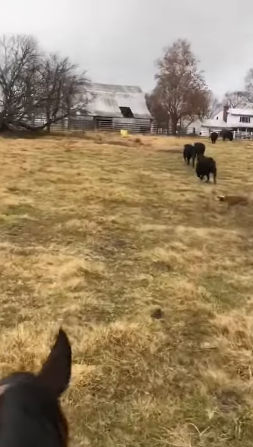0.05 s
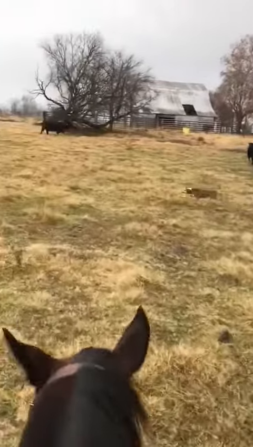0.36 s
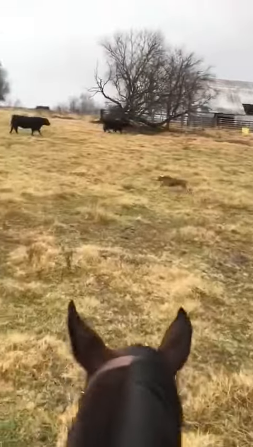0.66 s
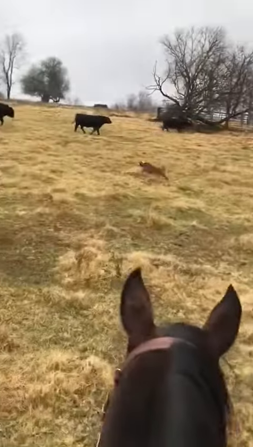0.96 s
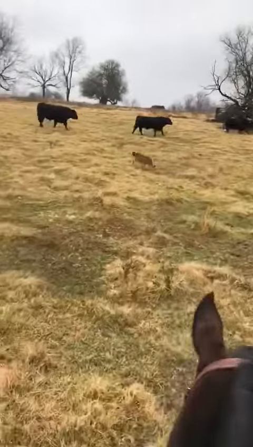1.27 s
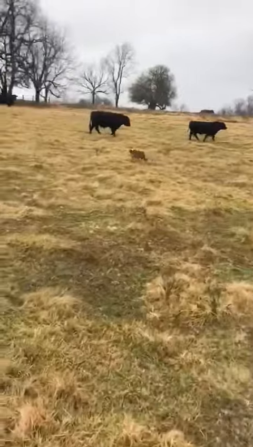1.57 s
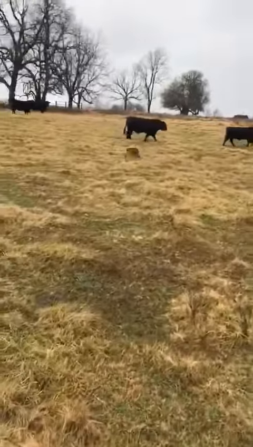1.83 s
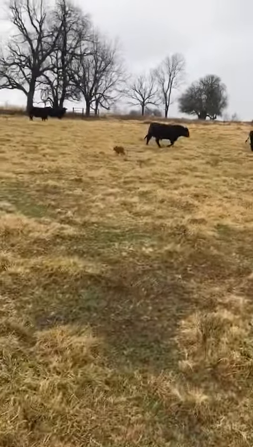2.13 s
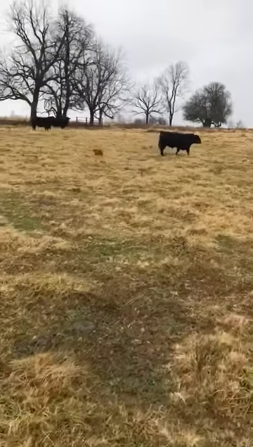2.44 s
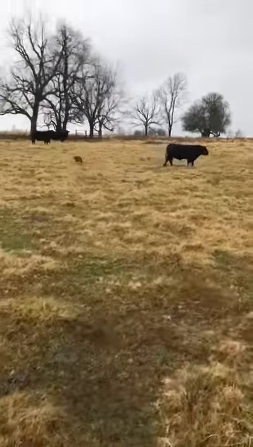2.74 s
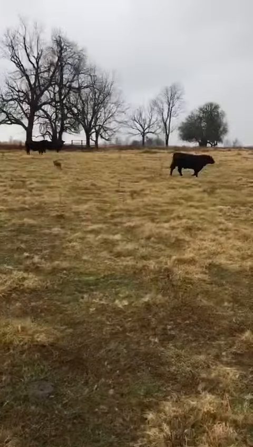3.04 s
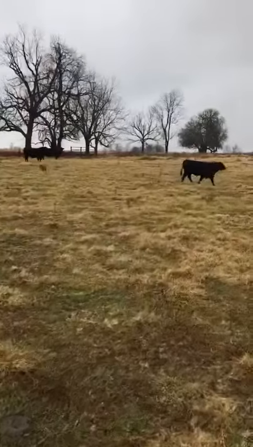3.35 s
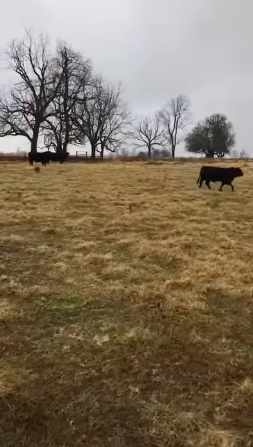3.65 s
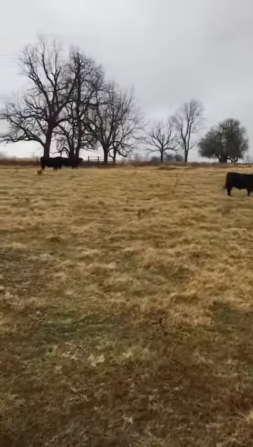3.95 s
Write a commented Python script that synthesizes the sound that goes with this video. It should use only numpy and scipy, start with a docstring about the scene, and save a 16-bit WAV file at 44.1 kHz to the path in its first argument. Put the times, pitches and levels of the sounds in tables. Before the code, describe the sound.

Cattle bellow across an open pasture. A short, higher call fills the first half second, followed by a faint, husky one. From about 1.5 seconds, deep, buzzing bellows from a bull and others overlap, loudest around 2.7 to 3.3 seconds. A softer low call continues, and a loud growling one starts near 3.8 seconds. Close by, horse tack clicks faintly, dry grass barely rustles and light wind bumps the microphone.

```python
"""An open pasture, heard from horseback: a bull and other cattle bellow in deep, overlapping voices.
Each bellow is a train of vocal pulses, a strong chest fundamental under buzzing nose and mouth
overtones, that breaks into a growl where the folds flap irregularly. Thin echoes trail the calls.
Close by, the tack clicks, dry grass rustles and light wind bumps the microphone."""
import sys
import numpy as np
from scipy import signal
from scipy.fft import rfft, irfft
from scipy.io import wavfile

SR = 44100
rng = np.random.default_rng(int(sys.argv[2]) if len(sys.argv) > 2 else 0)


def persist_wave(psi):
    """Save psi, clipped to +-1, as 16-bit WAV."""
    counts = np.round(np.clip(psi, -1, 1) * 32767).astype(np.int16)
    wavfile.write(sys.argv[1], SR, np.atleast_2d(counts).T)


N = 176400
T = np.arange(N) / SR


def amp(db):
    """Decibels to gain."""
    return 10 ** (np.asarray(db) / 20)


def unit(x):
    """Scales to rms 1."""
    return x / np.sqrt(np.mean(x ** 2) + 1e-20)


def colour(points, hz):
    """Gain of an EQ curve (f/Hz, level/dB) at these frequencies."""
    f, db = np.transpose(points)
    return amp(np.interp(np.log(hz + 1), np.log(f), db))


def shaped(x, points):
    """Filters x through an EQ curve."""
    return irfft(rfft(x) * colour(points, np.fft.rfftfreq(len(x), 1 / SR)), len(x))


def wander(rate_hz):
    """Smooth random motion of rms 1."""
    hz = np.fft.rfftfreq(N, 1 / SR)
    return unit(irfft(rfft(rng.standard_normal(N)) / np.sqrt(1 + (hz / rate_hz) ** 6), N))


def add(mix, s, sound):
    """Mixes a sound in at time s."""
    part = mix[max(round(s * SR), 0):][:len(sound)]
    part += sound[:len(part)]


def wind():
    """Low buffets on the microphone over the soft, flickering hiss of open air."""
    # Noise colours: f/Hz, level/dB
    buffet_eq = [(15, -23.5), (30, -15), (48, 5), (80, -1.5), (115, -9), (200, -13), (400, -41), (900, -85)]
    air_eq = [(120, -21), (200, 5.5), (296, -11), (454, -10.5), (596, -10.5), (757, -9), (838, -11.5),
              (913, -11.5), (1280, -10.5), (2330, -22), (2720, -22), (2960, -23.5), (5030, -28.5),
              (5960, -28.5), (7840, -35), (9780, -37), (11800, -46), (15300, -71), (22000, -120)]
    # Fader rides: t/s, level/dB
    buffet_ride = [(0.0, -59), (0.03, -44), (0.1, -51), (0.2, -32.5), (0.49, -43.5), (0.95, -46),
                   (0.98, -39.5), (1.06, -57), (1.16, -44), (1.22, -55), (1.43, -45), (1.46, -48),
                   (1.86, -43.5), (1.89, -29.5), (1.94, -48), (1.98, -30), (2.1, -56), (2.15, -45),
                   (2.24, -56), (2.28, -41), (2.47, -51.5), (2.87, -64), (3.01, -34), (3.05, -51),
                   (3.11, -33.5), (3.16, -69), (3.31, -42.5), (3.44, -57), (3.49, -39.5), (3.8, -43.5),
                   (3.84, -62.5), (4.0, -56)]
    air_ride = [(0, -47), (.5, -52), (.8, -55), (1.4, -52), (2.4, -50.5), (3.2, -50.5), (3.6, -51.5),
                (4, -53)]
    buffets = unit(shaped(rng.standard_normal(N), buffet_eq))
    hiss = unit(shaped(rng.standard_normal(N), air_eq))
    buffet_db = np.interp(T, *np.transpose(buffet_ride))
    hiss_db = np.interp(T, *np.transpose(air_ride)) + 1.7 * wander(21)
    return amp(buffet_db) * buffets + amp(hiss_db) * hiss


def grass():
    """Dry stems crackle in short swishes over a faint, steady rustle."""
    # Swishes: centre t/s, width/s, level/dB
    swishes = [(.23, 0.038, -70.5), (.42, 0.27, -72.5), (.64, 0.033, -62), (.86, 0.14, -66.5),
               (1.32, 0.041, -64.5), (1.81, 0.03, -68), (2.3, 0.099, -101), (3.2, 0.12, -72.5)]
    # Colour of the stems: f/Hz, level/dB
    stem_eq = [(800, -12), (2500, -3), (5000, -4), (6500, 3), (7600, -3), (9500, -4), (11800, -10)]
    swells = sum(amp(db) * np.exp(-.5 * ((T - s) / width) ** 2) for s, width, db in swishes)
    stems = rng.standard_normal(N) * amp(3 * np.minimum(rng.exponential(1, N), 5))
    stems *= rng.random(N) < 4000 / SR  # about 4000 crackles a second
    return (swells + amp(-76)) * unit(shaped(stems, stem_eq))


def taps(rows, rise_cycles, tail_db, tail_s):
    """Each contact gives a brief snap, then a faint rattle around the same pitch."""
    out, t = np.zeros(N), T[:2048]
    for s, db, hz in rows:
        age = hz * t / rise_cycles
        snap = age * np.exp(1 - age) * np.sin(2 * np.pi * hz * t)
        rattle_eq = [(hz / 4, -20), (hz * 2, -2), (hz * .96, 0), (hz * 2, -13), (hz * 4, -22)]
        rattle = unit(shaped(rng.standard_normal(len(t)), rattle_eq))
        add(out, s, amp(db) * (snap + amp(tail_db) * rattle * np.exp(-t / tail_s)))
    return out


def tack():
    """Clicks of bridle and buckles ring their small resonances; the saddle knocks more dully."""
    # Contacts, ahead of gain and EQ: t/s, level/dB, f/Hz
    bridle_clicks = [(.19, -45, 3200), (.2208, -41.5, 2600), (.28, -45.5, 3000), (.570, -44, 4500),
                     (.721, -47.5, 2200), (.824, -44.5, 3200), (.8415, -36.5, 2500), (.8515, -45, 1990),
                     (.959, -48.5, 3000), (1.0195, -45.5, 3200), (1.051, -51, 2700), (1.198, -48, 2500),
                     (1.4003, -40.5, 2500), (1.4245, -36, 5600), (1.427, -45, 1850), (1.462, -46.5, 2200),
                     (1.541, -49, 5030), (2.091, -48, 4000), (2.4115, -36, 3400), (2.651, -43, 3570),
                     (2.8118, -37, 3800), (2.866, -50, 4400), (3.009, -41, 2380), (3.014, -41, 3830),
                     (3.2416, -42.5, 3780), (3.5114, -39, 2960), (3.563, -45, 2612), (3.5953, -43.5, 3000),
                     (3.6185, -40.5, 2700), (3.6245, -41, 3800), (3.9096, -46, 3000)]
    saddle_knocks = [(1.278, -53.5, 842), (1.4255, -47.5, 600), (1.8425, -43.5, 820)]
    # Buckle resonances: f/Hz, width/Hz, level/dB
    buckle_modes = [(1050, 210, -1), (1640, 350, 5), (2311, 240, 4.5), (2870, 300, 3), (3545, 280, 2),
                    (4340, 190, 1), (5830, 410, 1.5)]
    # Colour of all the tack: f/Hz, level/dB
    tack_eq = [(300, -18), (700, 11.5), (4500, 3.5), (6500, -4), (11000, -6.5)]
    snaps = taps(bridle_clicks, rise_cycles=.55, tail_db=-14, tail_s=.005)
    rings = sum(amp(db) * signal.lfilter(*signal.iirpeak(hz, hz / width, SR), snaps)
                for hz, width, db in buckle_modes)
    bare_contact = -amp(-3.5) * snaps
    knocks = amp(-4) * taps(saddle_knocks, rise_cycles=1, tail_db=-5, tail_s=.0078)
    return shaped(rings + bare_contact + knocks, tack_eq)


def field_echoes(x, send_db=-13, t60_s=.4):
    """Adds thin scattered echoes from ground, trees and barn."""
    # Colour of the echoes: f/Hz, level/dB
    echo_eq = [(150, -8), (600, 0), (1300, 2), (2500, -4), (5000, -8)]
    t = T[:SR]
    echoes = rng.standard_normal(SR) * (rng.random(SR) < 2000 / SR)
    echoes *= amp(-60 * t / t60_s) * (t > .01)
    response = shaped(echoes / np.linalg.norm(echoes), echo_eq)
    return x + amp(send_db) * signal.fftconvolve(x, response)[:N]


def growls(flaps_per_s=190):
    """Irregular flaps of the vocal folds ring a low throat resonance."""
    # Growls: start t/s, length/s, f/Hz, width of each filter pass/Hz, level/dB
    growl_cues = [(1.48, 0.079, 244, 33, -40), (2.46, 0.32, 248, 16, -40), (2.72, 0.16, 238, 30, -34),
                  (1.66, 0.49, 246, 54, -46), (3.76, .3, 311, 36, -49.5), (3.78, 0.21, 390, 39, -46),
                  (.31, 0.13, 389, 22, -51)]
    out = np.zeros(N)
    for start, length, hz, width, db in growl_cues:
        flaps = rng.standard_normal(N) * (rng.random(N) < flaps_per_s / SR)
        b, a = signal.iirpeak(hz, hz / width, SR)
        ring = signal.lfilter(b, a, signal.lfilter(b, a, flaps))[-int(length * SR):]
        swell = np.sin(np.linspace(0, np.pi, len(ring)))
        add(out, start, amp(db) * unit(ring) * swell)
    return out


def overtones(turns, hz, eq, below, delay_s_per_khz=.000502):
    """Harmonics from the second up through causal resonances, so that each pulse rings on; rms 1."""
    k = np.arange(2, below)[:, None]
    gains = colour(eq, k * hz)
    grid = np.fft.fftfreq(8192, 1 / SR)
    lag = signal.hilbert(np.log(colour(eq, abs(grid)))).imag  # minimum phase
    lag += np.pi * delay_s_per_khz * grid ** 2 / 1000  # higher resonances answer slightly later
    phase = np.interp(k * hz, grid[grid >= 0], lag[grid >= 0])
    return (gains * np.cos(2 * np.pi * k * turns - phase)).sum(0) / np.sqrt((gains ** 2).sum(0) / 2)


def bellow(call, nose, throat, rasp, later=None, shift_at_s=np.inf):
    """Vocal pulses sound through chest, nose and mouth; roughness shakes them, air rasps each cycle."""
    jitter, jitter_hz, shimmer_hz = .0048, 28, 47.6
    edge_s, shift_s, puff_cycles = .02, .2, .36
    s, *columns = np.transpose(call)
    on = (T > s[0] - edge_s) & (T < s[-1] + edge_s)
    t = T[on]
    hz, chest_db, nose_db, mouth_db, rough = (np.interp(t, s, c) for c in columns)
    turns = np.cumsum(hz * (1 + jitter * wander(jitter_hz)[on])) / SR
    shimmer = wander(shimmer_hz)[on] + 1j * wander(shimmer_hz)[on]
    shake = (1 + rough * shimmer) / np.sqrt(1 + 2 * rough ** 2)
    chest = np.sqrt(2) * (shake * np.exp(2j * np.pi * turns)).real
    turns += rough ** 2 * wander(shimmer_hz)[on] / (4 * np.pi)  # roughness smears the overtones
    nasal = abs(shake) * overtones(turns, hz, nose, below=5)
    puffs = rng.standard_normal(N)[on] * (.24 + np.exp(-(turns % 1) / puff_cycles))
    breath_share = np.clip(rasp + rough ** 2, 0, 1)

    def voiced(eq):
        """Buzz and breath through one mouth shape."""
        buzz = overtones(turns, hz, eq, below=27)
        breath = unit(shaped(puffs, eq + [(9000, -48)]))
        return np.sqrt(1 - breath_share) * buzz + np.sqrt(breath_share) * breath

    morph = np.clip((t - shift_at_s) / shift_s, 0, 1)  # the mouth moves to its later shape, if any
    mouth = np.sqrt(1 - morph) * voiced(throat) + np.sqrt(morph) * voiced(later or throat)
    fade = np.clip((t - s[0]) / edge_s + 1, 0, 1) * np.clip((s[-1] - t) / edge_s + 1, 0, 1)
    out = np.zeros(N)
    out[on] = fade * (amp(chest_db) * chest + amp(nose_db) * nasal + amp(mouth_db) * mouth)
    return out


def cattle():
    """Eight overlapping bellows, each coloured by a nose and a throat, with growls mixed in."""
    # Calls: t/s, pitch f/Hz, chest level/dB, nose level/dB, mouth level/dB, roughness/0-1
    ending_call = [(0, 177.3, -43, -59, -42.5, 0.1), (.04, 171.7, -25.5, -42, -50, 0.15),
                   (.09, 159, -47, -59, -62, 0)]
    high_call = [(0, 216.2, -34.5, -58, -71, 0.24), (.08, 219.7, -29, -55, -52, .1),
                 (.17, 231.3, -33, -56, -44.5, 0.037), (.27, 221.8, -30, -65, -50.5, 0.018),
                 (.34, 202.3, -29.5, -50.5, -55, 0.033), (.40, 170.5, -28, -70, -48.5, 0.42),
                 (.45, 164.5, -39.5, -69, -62, 0.9), (.465, 172, -41, -69, -45, 1),
                 (.49, 175.9, -43, -74, -59.5, 0.77), (.525, 180, -47.5, -71, -49, 0.31),
                 (.58, 171, -52, -82, -76, 0.73)]
    far_call = [(.82, 137, -49, -64.5, -71, 0.11), (1, 151.1, -50, -60.5, -98, 0.066),
                (1.17, 164.2, -42.5, -81, -58.5, 0.055), (1.33, 159.1, -46.5, -81, -85, .08),
                (1.47, 156.2, -41, -57, -77, 0.11), (1.51, 166.4, -31.5, -80, -70, 0.3),
                (1.55, 178.4, -41, -79, -68, 0.78)]
    buzzing_call = [(1.47, 129.4, -58, -51, -67, 1), (1.53, 134.5, -56, -44, -65, 0.1),
                    (1.59, 145.5, -45, -34, -53.5, .08), (1.64, 153, -37.5, -52, -47.5, 0.058),
                    (1.735, 161.8, -35.5, -49.5, -49, 0.08), (1.8, 155.4, -37.5, -46.5, -48.5, 0.087),
                    (1.92, 155.1, -38, -48.5, -49, 0.05), (2.1, 150.5, -35.5, -49, -56.5, 0.06),
                    (2.2, 154.8, -38, -46, -49.5, 0.035), (2.38, 153.4, -41, -41.5, -48.5, 0.018),
                    (2.5, 147.6, -50.5, -37.5, -51, 0.058), (2.6, 141.9, -40.5, -39, -50.5, 0.13),
                    (2.76, 144.6, -43.5, -43, -61, 0.18), (2.81, 136.4, -66.5, -60, -50, 0.56)]
    loud_call = [(2.0, 132.6, -62, -52, -52, 0.18), (2.05, 132.1, -33, -48.5, -54, .15),
                 (2.14, 133.2, -36, -50, -52.5, 0.34), (2.2, 130.9, -35, -46, -45.5, 0.2),
                 (2.3, 137, -38, -45.5, -48.5, 0.083), (2.4, 144.2, -31, -47, -51.5, 0.034),
                 (2.55, 149.5, -30, -48.5, -50.5, 0.045), (2.68, 152.1, -31, -46.5, -51, 0.05),
                 (2.75, 156.9, -25.5, -48.5, -47.5, .06), (2.82, 163.4, -25.5, -57, -47.5, 0.082),
                 (2.92, 164.3, -24, -54.5, -44.5, 0.13), (3.12, 170.8, -24, -56, -47, 0.068),
                 (3.22, 167.2, -22.5, -58.5, -49, 0.056), (3.275, 169.8, -26, -58.5, -47, 0.078),
                 (3.305, 171.8, -24.5, -59, -78, 0.26), (3.325, 169.8, -37.5, -68.5, -55.5, 0.23),
                 (3.5, 164.8, -47, -57.5, -69, 0.18), (3.56, 158, -51, -63, -60, 0.22)]
    low_call = [(2.6, 100.2, -49, -46, -51, .3), (2.75, 120.5, -44, -68, -74, .08),
                (2.9, 122.6, -40.5, -56, -59.5, 0.081), (3.2, 122.5, -47.5, -53.5, -57, .1),
                (3.35, 128.6, -37.5, -51.5, -52, 0.5), (3.45, 129.8, -37, -50, -53.5, 0.4),
                (3.58, 130.5, -34.5, -51.5, -64, .04), (3.75, 125.4, -38, -50, -55.5, 0.03),
                (3.86, 124.6, -39, -53, -50, .03), (4, 119, -48, -57.5, -73, .2)]
    strained_call = [(2.92, 172.7, -58.5, -68, -53.5, 0.38), (3.02, 176.6, -45.5, -63, -46.5, 0.34),
                     (3.08, 180.2, -45, -63.5, -47, .08), (3.21, 182.7, -47, -63.5, -44.5, 0.088),
                     (3.28, 179.4, -46.5, -61.5, -47.5, .3), (3.32, 175.6, -57, -63, -57.5, 1)]
    growling_call = [(3.74, 215.2, -42, -57, -76, 0.44), (3.79, 224.8, -34, -62, -77, 1),
                     (3.86, 226.7, -25, -69, -51, 1), (3.93, 210.4, -24.5, -67.5, -52, 0.99),
                     (3.97, 224.6, -22.5, -61, -62, 0.54), (4, 230, -21, -64, -67, 0.38)]
    # Nasal colours: f/Hz, level/dB
    hummed_nose = [(240, 6.5), (320, 1.5), (380, -12), (470, -26.5), (600, -21)]
    open_nose = [(240, 3.5), (320, -0.5), (400, -5), (450, 0), (490, -13.5), (600, -23.5)]
    high_nose = [(240, 1), (350, -2), (440, 15), (530, 23), (640, -45)]
    # Throat formants, heard through the mouth: f/Hz, level/dB
    high_throat = [(480, -42), (690, 10), (880, -40), (1120, 1.5), (1380, -15), (1620, 2), (1950, -31),
                   (3100, -44), (4200, -33)]
    low_throat = [(480, -12.5), (640, -7), (770, 1), (890, -11.5), (1010, 10.5), (1130, -4), (1230, 7.5),
                  (1400, -3), (1700, -18), (4200, -41)]
    bright_throat = [(480, -20), (620, -1), (790, -14), (950, -8), (1100, -6), (1260, 2), (1420, -2),
                     (1560, -4), (1720, -17), (1900, -21), (2190, -10), (2400, -21), (2560, -17),
                     (2850, -17), (3020, -28), (3240, -17), (3450, -27), (4200, -34)]
    brassy_throat = [(310, -20), (460, -4), (615, -4), (770, -13), (925, -2), (1080, -6), (1230, -1),
                     (1385, 1), (1540, -3), (1700, -19), (1920, -27), (2160, -10), (2310, -13), (2460, -13),
                     (2610, -26), (2760, -17), (3000, -29), (3220, -12), (3400, -29), (4200, -34)]
    wide_throat = [(480, -26), (680, 13), (830, -5), (1050, 0.5), (1180, -1), (1330, 10), (1450, -10),
                   (1640, -4), (1850, -24), (2200, -14), (2400, -22), (2800, -30), (4200, -30)]
    round_throat = [(480, -30), (670, 18.5), (760, -2.5), (850, 1), (960, 0), (1050, 5), (1160, 10.5),
                    (1310, 4.5), (1420, -16), (1530, -10.5), (1640, -3), (1810, -2), (1930, -22),
                    (2150, -17.5), (2370, -16), (2550, -22.5), (2950, -20.5), (4200, -38.5)]
    strained_throat = [(480, -26), (715, 0), (880, -13), (1070, 1.5), (1170, -11.5), (1275, 5),
                       (1400, -24.5), (1640, -10.5), (1850, -24.5), (2600, -38), (2930, -25.5), (3300, -40),
                       (4200, -41)]
    husky_throat = [(450, -17), (600, -8), (720, -3), (850, -16), (1000, -5), (1100, 4), (1230, 17.5),
                    (1500, 2.5), (1750, -21), (4200, -34)]
    return (bellow(high_call, high_nose, high_throat, rasp=.1, later=low_throat, shift_at_s=.3)
            + bellow(buzzing_call, hummed_nose, bright_throat, rasp=.1,
                     later=brassy_throat, shift_at_s=1.98)
            + bellow(loud_call, open_nose, wide_throat, rasp=.09, later=round_throat, shift_at_s=2.38)
            + bellow(strained_call, hummed_nose, strained_throat, rasp=.2)
            + bellow(ending_call, high_nose, low_throat, rasp=.05)
            + bellow(low_call, hummed_nose, low_throat, rasp=.25)
            + bellow(far_call, hummed_nose, husky_throat, rasp=.77)
            + bellow(growling_call, hummed_nose, husky_throat, rasp=.12)
            + growls())


def scene():
    """Distant cattle, with tack, grass and wind close by, in mono."""
    return (field_echoes(cattle()) + tack() + grass() + wind())[None]


def record(dry, cutoff_hz=11850):
    """A steep low-pass takes the top treble off the mix."""
    lowpass = signal.firwin(511, cutoff_hz, window=("kaiser", 9), fs=SR)
    return signal.oaconvolve(dry, lowpass[None], "same")


dry = scene()
out = record(dry)
persist_wave(out)
```